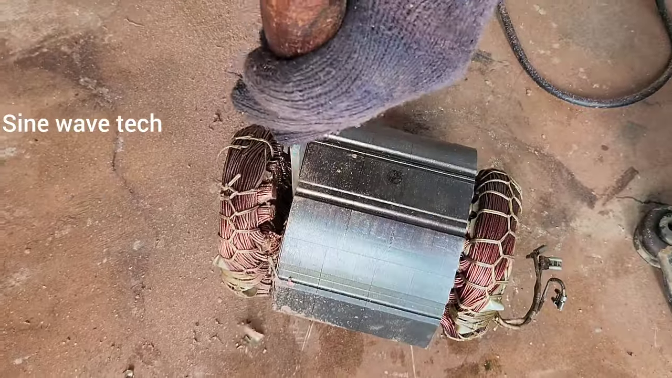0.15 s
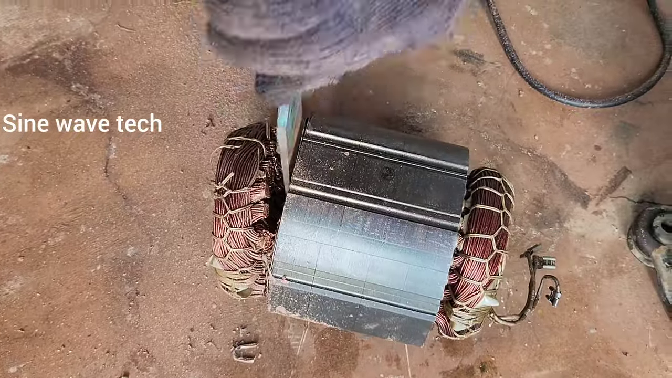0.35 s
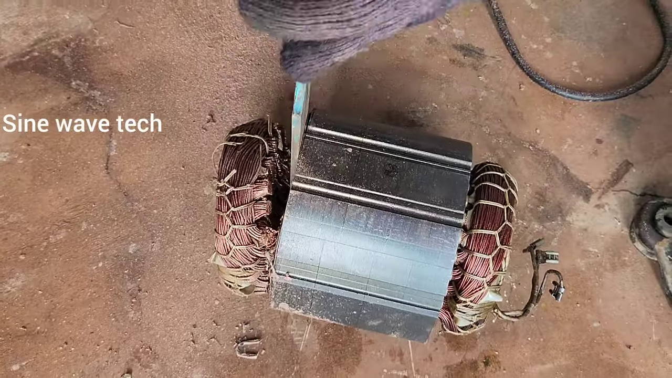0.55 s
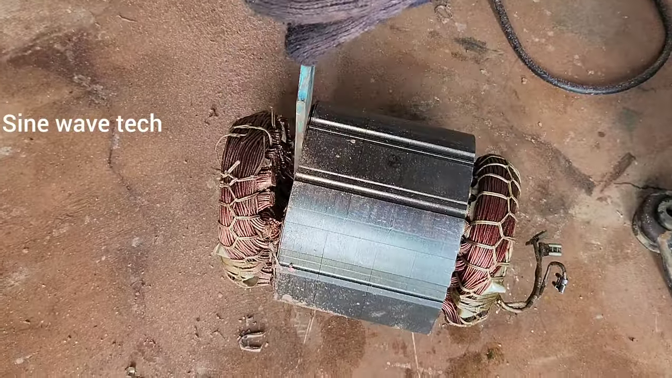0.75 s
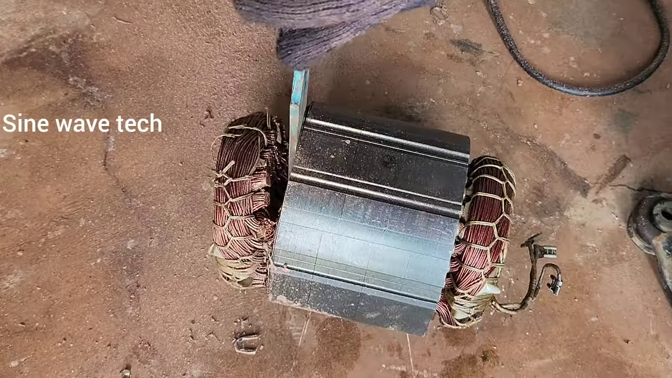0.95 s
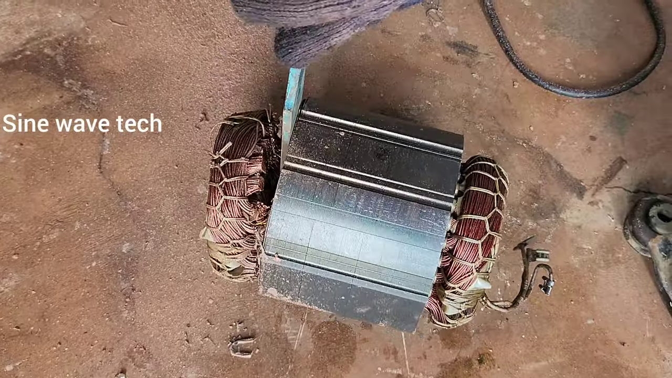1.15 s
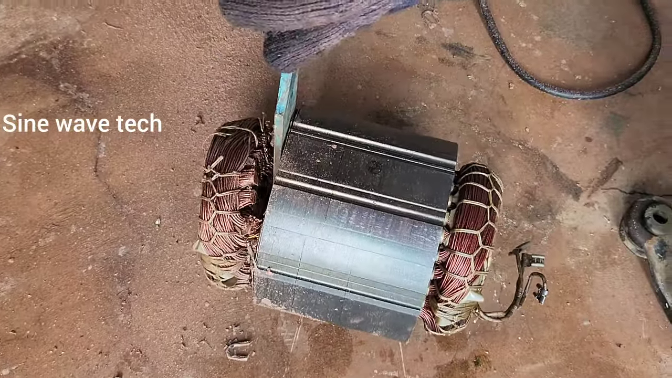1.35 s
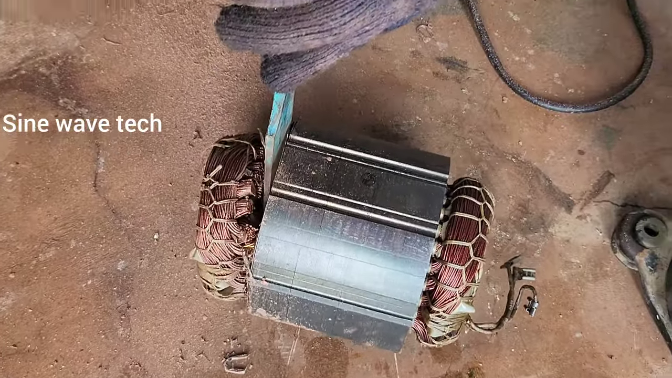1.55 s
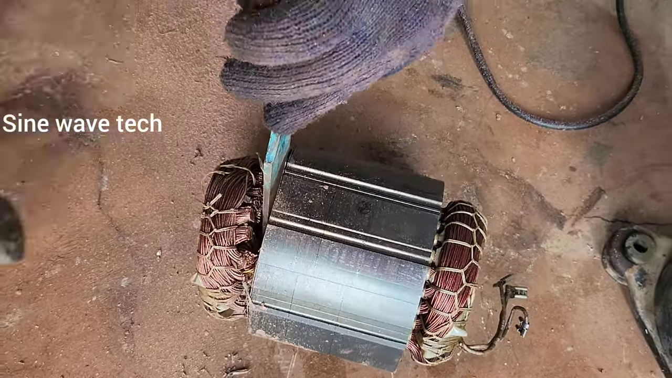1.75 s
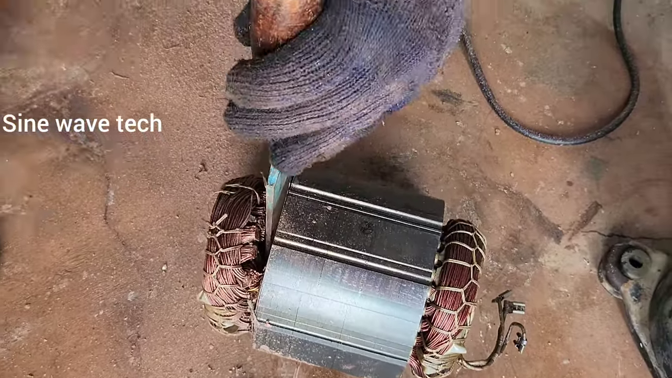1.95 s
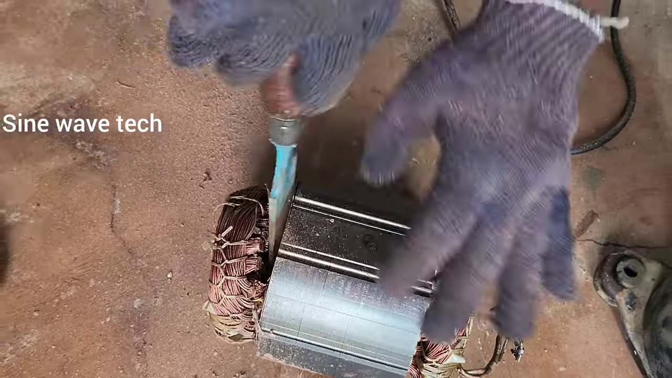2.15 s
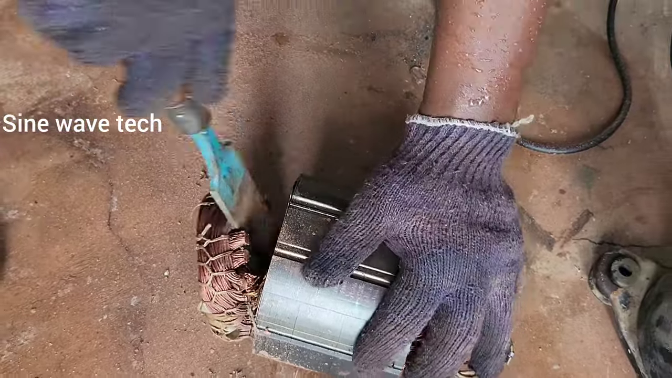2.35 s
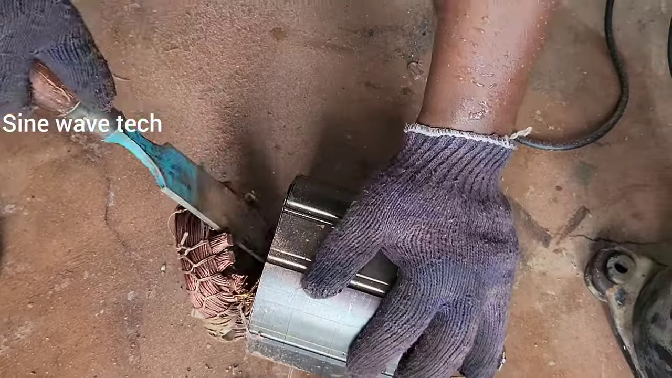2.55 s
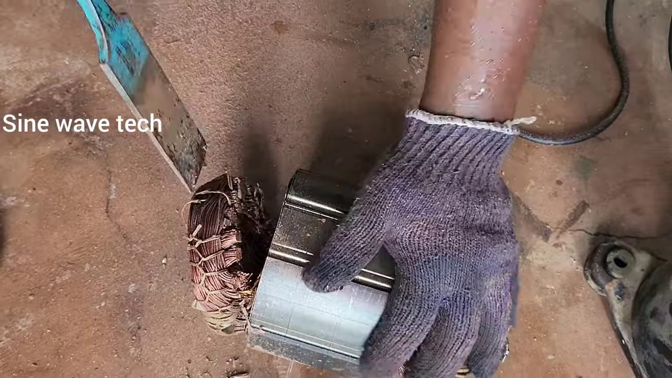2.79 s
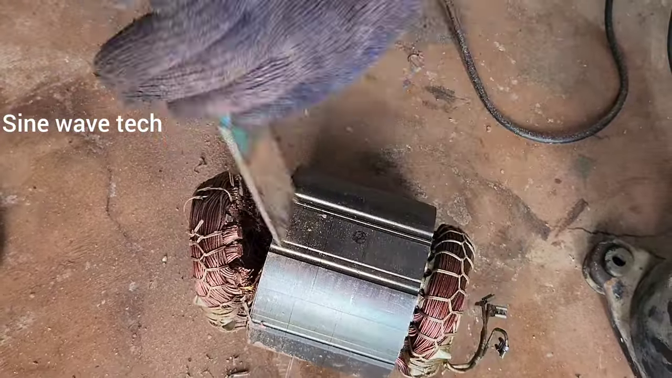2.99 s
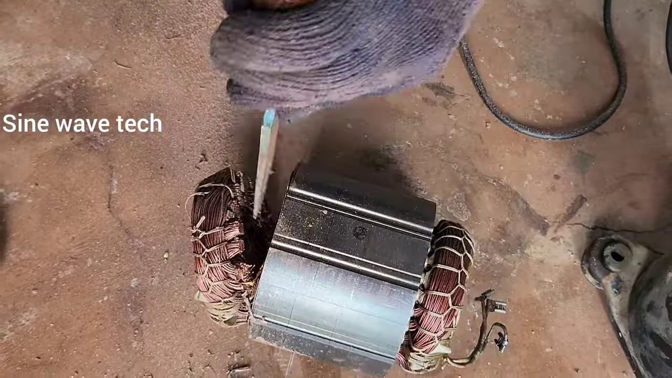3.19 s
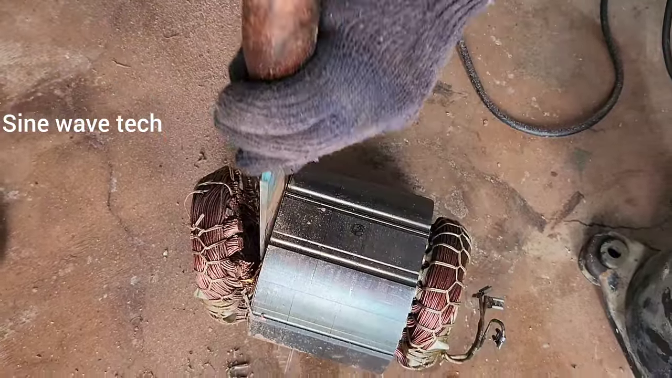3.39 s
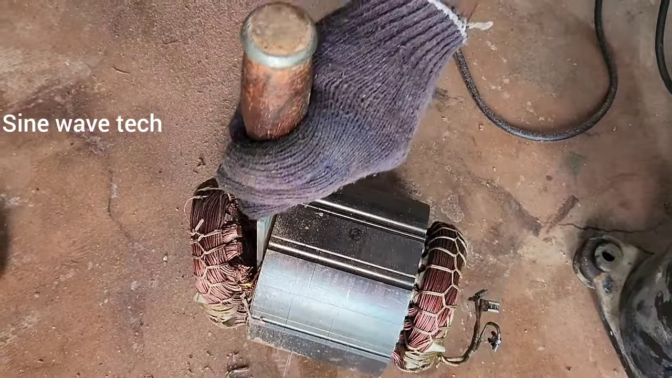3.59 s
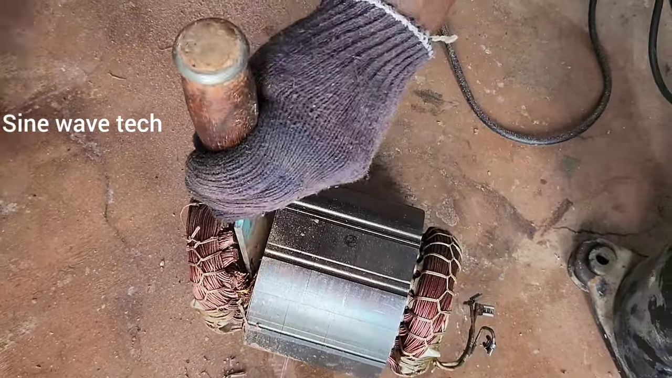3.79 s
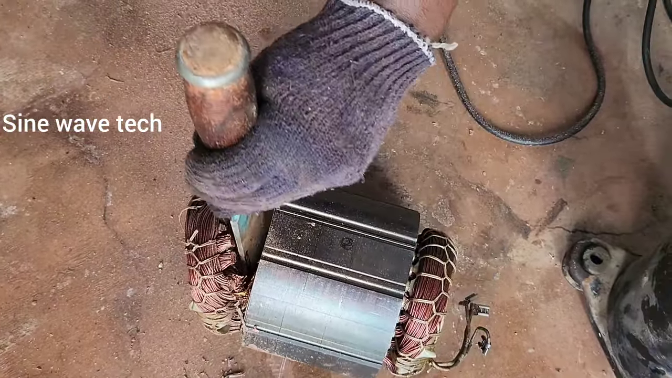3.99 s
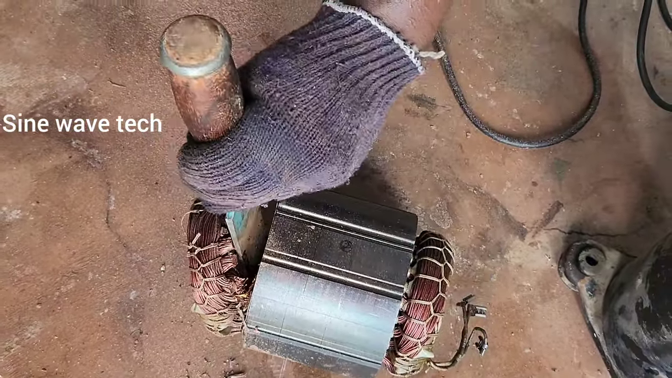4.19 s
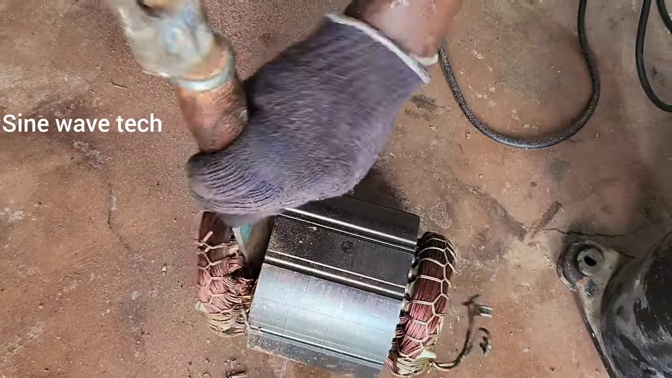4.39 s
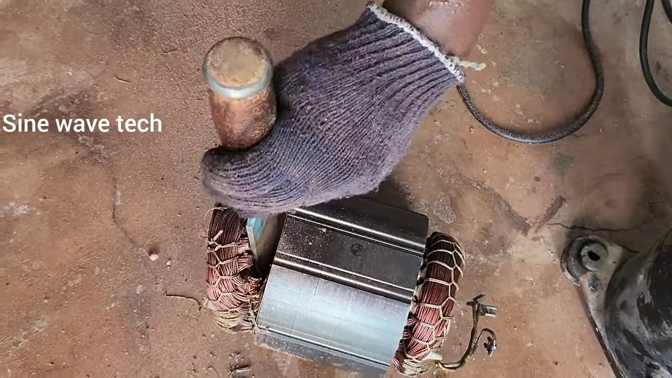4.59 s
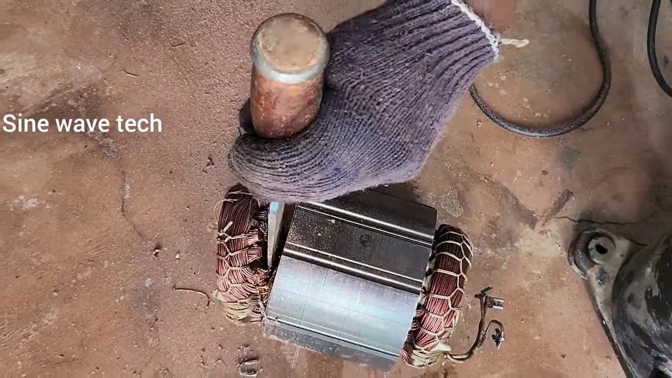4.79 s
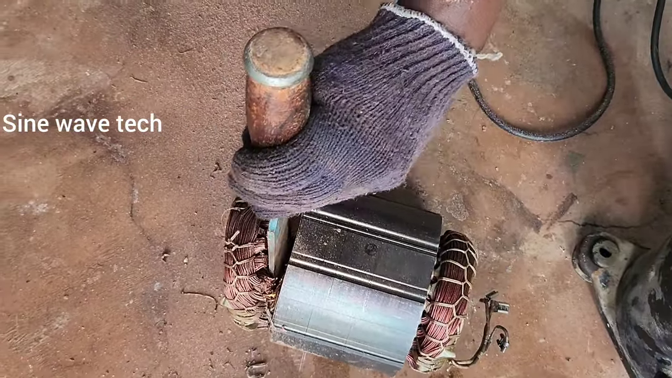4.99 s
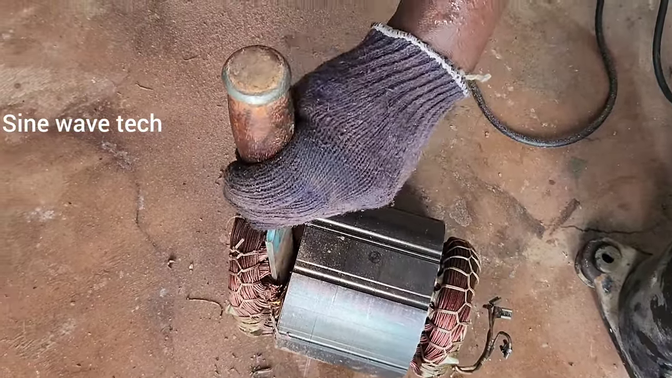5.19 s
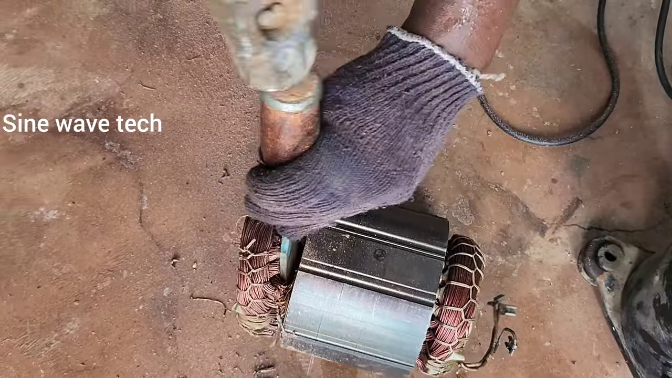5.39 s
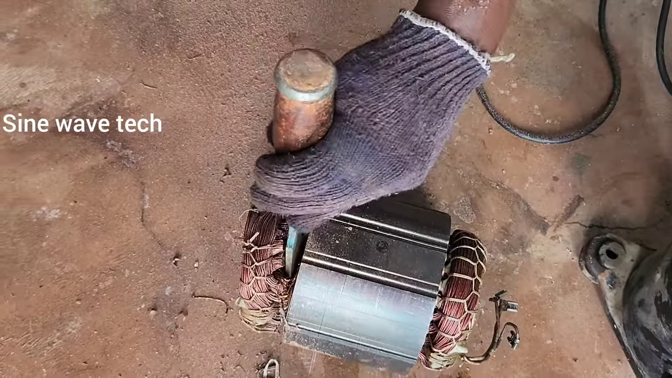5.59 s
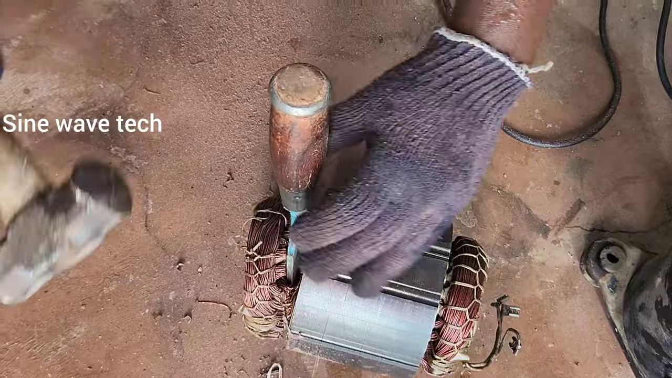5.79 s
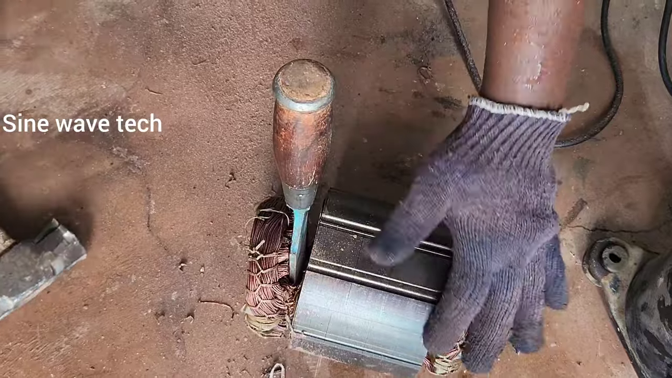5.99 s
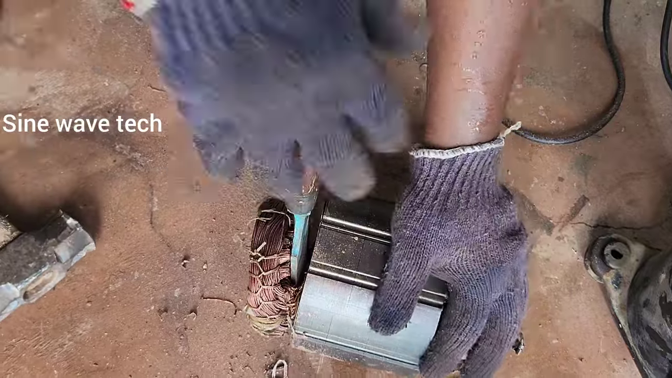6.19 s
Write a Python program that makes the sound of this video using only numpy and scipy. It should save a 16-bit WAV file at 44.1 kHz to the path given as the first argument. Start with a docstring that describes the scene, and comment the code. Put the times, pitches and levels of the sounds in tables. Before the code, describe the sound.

Close up in a small workshop, very quiet low machine rumble and soft glove rustle lie under sharp tool sounds. A hammer strikes a chisel at 0.05 s: a hard mid-heavy crack, short rattle, quickly damped metal ring, low floor shake. Small steel ticks and slides follow. Blows repeat at 1.15 and 1.5 s, with a faint hammer-head brush just before the latter. Around 1.9 s a thin squeak leads into dull floor bumps and a sharp handle clap at 2.07 s. From 2.25 to 2.8 s cut wires snap in bright, irregular crackles with scraping. The lifted chisel taps with a longer ring at 3.1 and 3.45 s; a bump lands at 3.75 s. Light clinks surround blows at 4.45 and 5.45 s, with a tap at 4.7 s. At 6.05 s bumps return, ending in a clap at 6.15 s. Echoes are short.

```python
"""Over far machinery and rustling gloves, a hammer drives a chisel into a stator's copper windings: three blows.
At 2 s it is laid down with bumps and a clap; cut wires crackle, then the lifted chisel taps and two blows follow.
At 6 s more bumps and a clap close the scene; in between the chisel slides and clinks and thin tones squeak.
Contacts are coloured noise (crack, then rattle), steel is ringing resonances, the beds are banded noise;
a small room answers with decaying noise."""
import sys
import numpy as np
from scipy import signal
from scipy.fft import rfft, irfft
from scipy.io import wavfile

SR = 44100
rng = np.random.default_rng(int(sys.argv[2]) if len(sys.argv) > 2 else 0)


def file_out(sig):
    """Save sig as 16-bit WAV at sys.argv[1]."""
    # one column per channel
    cols = np.atleast_2d(sig).T
    # limit, then scale
    lim = np.clip(cols, -1, 1)
    pcm = np.round(lim * 32767).astype(np.int16)
    wavfile.write(sys.argv[1], SR, pcm)


N = 275625   # samples in the scene

# Far machinery: t/s, rumble level/dB; then its colour: f/Hz, density/dB per Hz
RUMBLE = [(0.0, -58), (0.8, -60.5), (1.9, -60), (2.7, -61.5), (3.1, -58), (3.6, -61), (4.2, -58.5),
          (5.0, -60.5), (5.95, -66), (6.25, -66.5)]
RUMBLE_COLOUR = [(18, -42.5), (30, -18), (58, -2.5), (86, 2), (135, -1), (162, -23), (240, -19),
                 (310, -42.5), (530, -120)]
# Hum lines that each swell once: f/Hz, width/Hz, level/dB, loudest t/s, swell length/s
HUM = [(101, 4, -61, .72, .3), (72, 4, -64.5, 2.3, 0.27), (79, 6.7, -55.5, 3.95, .2),
       (60, 5, -58.5, 4.65, 0.17)]
# Gloves and tools shifting: t/s, rustle level/dB, steel-on-wire scrape level/dB
RUSTLE = [(0.0, -63.5, -82), (0.3, -73.5, -83), (0.61, -71.5, -80), (1.0, -68, -85.5), (1.76, -74.5, -83.5),
          (2.2, -73.5, -85.5), (2.5, -65.5, -64), (2.63, -71.5, -82), (2.76, -69.5, -70),
          (3.08, -64, -84.5), (3.22, -68.5, -83), (3.36, -65, -83), (3.55, -66, -70.5), (3.81, -69, -82.5),
          (4.02, -66.5, -73.5), (4.3, -68.5, -84), (4.75, -72.5, -93.5), (5.0, -73.5, -85),
          (5.5, -71.5, -86.5), (6.25, -80.5, -90)]
# Rustle colour before its tilt: f/Hz, density/dB per Hz
RUSTLE_COLOUR = [(100, -43), (170, 3.5), (239, -5.5), (279, 9), (522, 2.5), (1760, 1.5), (3000, 1.5),
                 (7340, -13.5), (8070, -7), (9390, -31), (10300, -31.5), (12700, -25.5), (16000, -38.5)]
# Room decay: f/Hz, t60/s
ROOM_DECAY = [(100, 0.52), (260, 0.4), (700, 0.14), (1840, 0.18), (4850, 0.21), (12800, 0.17)]
# Left-right likeness of diffuse sound: f/Hz, likeness/0..1
DIFFUSE_LIKENESS = [(60, .98), (130, .97), (290, .87), (640, .6), (1410, .1), (3100, .1), (15000, .05)]
# Left-right likeness of near sound: f/Hz, likeness/0..1
NEAR_LIKENESS = [(200, .97), (1000, .75), (2500, .35), (6000, .3), (15000, .3)]
# How late the right port hears near sound: f/Hz, delay/s
LAG = [(300, .00004), (1000, 0.00015), (3000, .0005), (15000, 0.00066)]
# Colour difference of the ports: f/Hz, left over right level/dB
PORTS = [(60, .5), (380, 1.5), (700, 2), (1290, 0), (2380, -2.5), (4400, -4.5), (8120, 0), (15000, 0)]
# Faint thin tones: t/s, f/Hz, level/dB, length/s
SQUEAKS = [(0.365, 1376, -77.5, 0.083), (1.909, 2890, -70, 0.04), (1.939, 2875, -59, 0.028),
           (1.964, 2903, -61.5, .1), (4.17, 1290, -77, 0.11), (5.124, 1581, -77.5, 0.12)]
# The hammer head is brushed: t/s, ring level/dB, tilt/dB per octave
BRUSHES = [(1.457, -70, -1.5), (5.847, -63.5, -1.5)]
# Hammer-head modes: f/Hz, relative level/dB, t60/s
HAMMER_MODES = [(2860, -14, .12), (4340, 0, .1), (6900, -6, .05), (8250, -3, .12), (12000, -6, .08),
                (13310, -3, .12)]
# Chisel touches or slides on steel: t/s, tick level/dB, slide level/dB, tilt/dB per octave, ring level/dB
TOUCHES = [(0.185, -41, -80, 4.5, -70), (0.3174, -59, -73, -1, -72), (0.4326, -64, -66, 8, -68),
           (0.498, -66, -78, -1.5, -68.5), (0.58, -65, -76, -2, -68), (0.626, -60, -69, -3.5, -70),
           (0.77, -75, -85, -0.5, -75.5), (0.928, -75, -78, -0.5, -71), (3.502, -64, -70.5, -4, -66),
           (3.562, -60, -67.5, -2.5, -65.5), (3.938, -58, -76, 0, -65), (4.7373, -54, -69, 0, -62),
           (4.929, -58, -78, 0, -68.5), (4.955, -68, -70, 2, -70), (5.15, -63, -74, -2, -71),
           (1.11, -68, -78, 4, -74), (4.421, -60, -78, 4, -74), (5.405, -64, -74, 4, -71)]
# The lifted chisel taps the stator: t/s, tick level/dB, slide level/dB, tilt/dB per octave, ring level/dB
TAPS = [(3.109, -43, -55.5, -5.5, -56.5), (3.4418, -46, -79, -6, -65), (4.678, -51, -63, -2, -60)]
# Colour of touches and taps before tilt: f/Hz, density/dB per Hz
TOUCH_COLOUR = [(1000, -7), (2400, -3), (4000, 1.5), (7300, 7), (9300, -15), (11000, -2.5), (13000, 0.5),
                (16000, -6)]
# Chisel modes while it rests on the work: f/Hz, relative level/dB, t60/s
CHISEL_MODES = [(1140, -8, .07), (2360, -4, .08), (3200, -6, .06), (3970, -4, .08), (5390, -8, .07),
                (7290, -4, .06), (9340, 2, .06), (11400, -12, .06), (12300, -7, .04), (13150, -2, .05)]
# Cut wires snapping free: t/s, crack level/dB, rattle level/dB, tilt/dB per octave
SNAPS = [(2.265, -59.5, -68, 1), (2.28, -61, -75, -4), (2.356, -59, -59, -4), (2.409, -47, -62, 3.5),
         (2.475, -47.5, -50, 4), (2.505, -51, -59.5, -7.5), (2.53, -66, -56.5, -3), (2.56, -48, -66, 1),
         (2.702, -54, -56, 0.5), (2.721, -46.5, -58.5, -1), (2.743, -59, -68, -6.5),
         (2.781, -47.5, -61, 4.5), (3.204, -69, -75, 8)]
# Colour of snaps before tilt, and of the wire scrape: f/Hz, density/dB per Hz
WIRE_COLOUR = [(1000, -23), (2000, -10), (3000, -2), (4500, 4), (6000, 0), (7400, 5), (9000, -5.5),
               (11800, -3), (16000, -10.5)]
# Dull bumps of tools and stator on the floor, and the knock under the lifted chisel's first tap at 3.11 s: t/s,
# crack level/dB, rattle level/dB, rattle hold/s, tilt/dB per octave
BUMPS = [(0.189, -43.5, -71, 0.026, 2.5), (1.022, -64, -59.5, 0.03, 2), (1.962, -30, -41, 0.022, -1),
         (2.017, -37.5, -47.5, 0.08, -1.5), (2.143, -47, -60.5, 0.066, 2), (3.111, -40, -60, 0.0068, 5.5),
         (3.654, -51, -61, 0.061, -7), (3.738, -34, -43, 0.02, -1), (6.041, -32.5, -42, 0.038, -1),
         (6.067, -29, -47, 0.062, -0.5), (6.109, -39.5, -46.5, 0.059, -4.5)]
# Bump colour before tilt: f/Hz, density/dB per Hz
BUMP_COLOUR = [(71, -45), (120, -24.5), (402, -0.5), (493, -9), (670, 2), (1140, -6), (1650, -8),
               (1790, -9.5), (2640, -11), (3520, -33), (11800, -49.5), (16000, -55)]
# The hammer handle claps down: t/s, crack level/dB, rattle level/dB, rattle hold/s, tilt/dB per octave
CLAPS = [(2.065, -16.5, -47, 0.064, 3), (6.153, -17, -49.5, 0.025, 1)]
# Clap colour before tilt: f/Hz, density/dB per Hz
CLAP_COLOUR = [(71, -45), (120, -15), (251, -8), (410, -6.5), (789, -11), (1030, 1), (1520, -5.5),
               (2640, -2.5), (4140, -13), (5190, -34), (6370, -32), (16000, -60)]
# Stator modes: f/Hz, relative level/dB, t60/s
STATOR_MODES = [(380, -8, .1), (600, -6, .06), (780, -3, .04), (920, 0, .04), (1150, 0, .04),
                (1300, -2, .04), (2130, -4, .05), (2520, -3, .05), (5400, -8, .2)]
# Hammer on chisel: t/s the edge bites, crack level/dB, rattle level/dB, rattle hold/s after the bite,
# tilt/dB per octave
BLOWS = [(0.049, -22, -29, 0.04, -1), (1.141, -24, -32, 0.041, 1.5), (1.533, -22, -32.5, 0.025, -1),
         (4.463, -23, -29.5, 0.046, -0.5), (5.451, -21, -28.5, 0.026, 0)]
# Blow colour before tilt: f/Hz, density/dB per Hz
BLOW_COLOUR = [(60, -24), (120, -16), (200, -19), (280, -7), (390, -3.5), (920, -7), (1600, -6), (2500, -6),
               (4000, -7.5), (4700, -10.5), (5400, -7), (6300, -18), (7500, -19.5), (10000, -33.5),
               (11800, -24), (16000, -37)]

EDGES = 25 * 2 ** np.arange(0, 9.7, .4)   # filter bank edges in Hz
CENTRES = np.sqrt(EDGES[1:] * EDGES[:-1])
SPAN = 8192   # samples in one contact
HZ = np.maximum(np.fft.rfftfreq(SPAN, 1 / SR), 10)

RUSTLE_TILT = -.5   # dB per octave
FLOOR_DB, FLOOR_RISE_S, FLOOR_T60_S = -47.5, .04, .6   # FLOOR_DB is the height before rise and decay
ROOM_DB, ROOM_GAP_S = -6.5, 0.0066   # echo level; time over which reflections build up
BOOM_DB, BOOM_T60_S, BOOM_HZ = -21, 0.56, 900   # a slower, duller part of the echo
SMALL_ROOM_DB = -1   # small sounds close by stir the room less
BRUSH_S, HAMMER_STRUCK_DB = 0.025, -61
SLIDE_S, TAP_S = 0.028, 0.0055
LIFTED_RING = 2.1   # the free chisel rings this many times longer
CHISEL_STRUCK_DB, CHISEL_DRIVEN_S = -43.5, 0.039   # the chisel rings while the blow drives it
BLOW_RING_TILT = -5   # dB per octave: the driven-in edge damps the high modes
SNAP_RATTLE_S = 0.023
STATOR_DB = -30
CRACK_LOW_HZ, CRACK_THIN = 750, 9   # below this the crack loses dB per octave: lows build up later
CRACK_RISE_S = .0008
HANDLE_GIVE_S = .008   # the wooden handle takes up the blow this long before the edge bites
LOW_CUT_HZ, CUTOFF_HZ = 33, 16600
TOP = .3   # ceiling of the soft peak rounding


def from_db(db):
    """Turns dB into amplitude."""
    return 10 ** (np.asarray(db) / 20)


def rms_one(x):
    """Scales a signal to rms 1."""
    return x / np.sqrt(np.mean(x ** 2) + 1e-20)


def in_time(rows):
    """Draws straight lines in time through each column of a table."""
    s, *columns = np.transpose(rows)
    return [np.interp(np.arange(N) / SR, s, column) for column in columns]


def at_hz(points, hz):
    """Reads a curve at any frequency, straight over log frequency."""
    points = np.array(points)
    return np.interp(np.log(hz), np.log(points[:, 0]), points[:, 1])


def band(x, k):
    """The k-th band of the filter bank."""
    return signal.sosfilt(signal.butter(2, EDGES[k:k + 2], "band", fs=SR, output="sos"), x)


def band_gains(spectrum, tilt):
    """Gains that give unit white noise this spectrum, tilted about 2 kHz, at rms 1."""
    gains = from_db(at_hz(spectrum, CENTRES) + tilt * np.log2(CENTRES / 2000))
    return gains / np.sqrt(np.sum(gains ** 2 * np.diff(EDGES)) / (SR / 2))


def causal(db):
    """The filter with these dB at HZ that does not ring ahead; unit noise comes out at rms 1."""
    db = db - 10 * np.log10(np.mean(from_db(db) ** 2))
    cepstrum = irfft(db * np.log(10) / 20)
    # folding the cepstrum forward in time makes the filter minimum phase
    cepstrum[1:SPAN // 2] *= 2
    cepstrum[SPAN // 2 + 1:] = 0
    return np.exp(rfft(cepstrum))


def drift(rate):
    """Slow chance: noise at every 40th sample through a double one-pole low-pass; spread 1."""
    r = np.exp(-80 * np.pi * rate / SR)
    noise = rng.standard_normal(N // 40 + 2002)
    slow = signal.lfilter([1], [1, -2 * r, r * r], noise)[2000:]
    return np.interp(np.arange(N) / 40, np.arange(len(slow)), rms_one(slow))


def ring(x, hz, t60):
    """A resonance: a unit click sets a decaying sine of starting height 1 ringing."""
    r, w = from_db(-60 / (t60 * SR)), 2 * np.pi * hz / SR
    return signal.lfilter([0, np.sin(w)], [1, -2 * r * np.cos(w), r * r], x + 1e-18)


def grit(size, spread_db):
    """Dense small collisions of uneven strength; rms 1."""
    strength = from_db(spread_db * np.minimum(rng.exponential(1, size), 5))
    return rms_one(rng.standard_normal(size) * strength)


def held(length_s, fade_s, rise_s=0.0021):
    """An envelope that rises, stays up until length_s, then dies away."""
    t = np.arange(SPAN) / SR
    return np.minimum(t / rise_s, 1) * np.exp(-np.maximum(t - length_s, 0) / fade_s)


def add(track, s, piece):
    """Lays a piece into a track at s seconds."""
    at = round(s * SR)
    track[..., at:at + piece.shape[-1]] += piece[..., :N - at]


def diffuse(white, k):
    """One band of sound from all sides: the ports grow less alike towards the treble."""
    mid, side = band(white, k)
    alike = np.clip(at_hz(DIFFUSE_LIKENESS, CENTRES[k]), 0, 1)
    return np.sqrt((1 + alike) / 2) * mid + np.sqrt((1 - alike) / 2) * side * [[1], [-1]]


def contacts(events, spectrum, crack_s, crack_tilt, fade_s, spread_db, ripple_db, rise_s, lead_s=0):
    """A short crack and a rattle of loose parts; each port hears its own share of the many small collisions."""
    out = np.zeros((2, N))
    alike = at_hz(NEAR_LIKENESS, HZ)
    late = np.exp(-2j * np.pi * HZ * at_hz(LAG, HZ))
    octaves = np.log2(np.maximum(HZ, 200) / 2000)
    thin = CRACK_THIN * np.maximum(np.log2(CRACK_LOW_HZ / HZ), 0)
    for s, crack_db, rattle_db, length_s, tilt in events:
        crack = from_db(crack_db) * held(crack_s, crack_s / 2, CRACK_RISE_S)
        rattle = from_db(rattle_db) * held(length_s + lead_s, fade_s, rise_s)
        crack_slope = (tilt + crack_tilt) * octaves - thin
        for at, shape, slope in (s, crack, crack_slope), (s - lead_s, rattle, tilt * octaves):
            # a random ripple every third of an octave
            ripple = np.interp(np.log2(HZ / 100), np.arange(0, 8, 1 / 3), rng.normal(0, ripple_db, 24))
            colour = causal(at_hz(spectrum, HZ) + slope + ripple)
            left, other = rfft(shape * [grit(SPAN, spread_db), grit(SPAN, spread_db)])
            right = alike * late * left + np.sqrt(1 - alike ** 2) * other
            add(out, at, irfft(colour * [left, right])[:, :SPAN * 7 // 8])
    return out


def steel(modes, strokes, luck_db):
    """Noise strokes (s, dB, length s, tilt) drive every mode of one piece of steel, each with chance strength."""
    out = 0
    pieces = [rng.standard_normal(SPAN) * held(length_s, 0.0027) for _, _, length_s, _ in strokes]
    chance = rng.normal(0, luck_db, (len(strokes), len(modes)))
    for k, (hz, mode_db, t60) in enumerate(modes):
        drive = np.zeros(N)
        for (s, db, _, tilt), piece, luck in zip(strokes, pieces, chance):
            # the dB set the height of the ring, however long the stroke
            reached = np.abs(ring(piece, hz, t60)).max()
            height_db = db + mode_db + tilt * np.log2(hz / 5000) + luck[k]
            add(drive, s, piece * from_db(height_db) / reached)
        at_right = np.roll(drive, round(at_hz(LAG, hz) * SR))
        out = out + ring(np.array([drive, at_right]), hz, t60)
    return out


def floor_shake():
    """Power of the low rumble that builds up in the floor after each blow and dies away."""
    since = np.maximum(np.arange(N) / SR - np.array(BLOWS)[:, :1], 0)
    shape = (1 - np.exp(-since / FLOOR_RISE_S)) * from_db(FLOOR_DB - 60 * since / FLOOR_T60_S)
    return np.sum(shape ** 2, axis=0)


def background():
    """Rustle and wire scrape flicker in patches over machinery and floor rumble, all as diffuse noise bands."""
    rustle_db, scrape_db = in_time(RUSTLE)
    rumble = np.sqrt(from_db(in_time(RUMBLE)[0]) ** 2 + floor_shake())
    white = rng.standard_normal((2, 2, N))
    together = drift(11)   # shared by all rustle bands
    scrape = from_db(scrape_db + 1.2 * drift(40))
    rustle_gains = band_gains(RUSTLE_COLOUR, RUSTLE_TILT)
    scrape_gains = band_gains(WIRE_COLOUR, 0)
    rumble_gains = band_gains(RUMBLE_COLOUR, 0)
    out = 0
    for k in range(len(CENTRES)):
        rustle = from_db(rustle_db + 0.92 * together + 0.47 * drift(7.9))
        power = (rustle_gains[k] * rustle) ** 2
        power = power + (scrape_gains[k] * scrape) ** 2 + (rumble_gains[k] * rumble) ** 2
        out = out + diffuse(white[k % 2], k) * np.sqrt(power)
    return out


def hum():
    """Narrow low lines of the machinery: noise through resonances, each swelling and fading."""
    t, white = np.arange(N) / SR, rng.standard_normal(N)
    out = np.zeros(N)
    for hz, width, db, s, length_s in HUM:
        swell = from_db(db) * np.exp(-((t - s) / length_s) ** 2)
        t60 = np.log(1000) / np.pi / width
        out += swell * rms_one(ring(white, hz, t60))
    return out


def room(x):
    """Dense reflections that die band by band, with a slower boom under them."""
    t, white = np.arange(SR // 2) / SR, rng.standard_normal((2, 2, SR // 2))
    boom = from_db(BOOM_DB - 60 * t / BOOM_T60_S)
    tail = 0
    for k, hz in enumerate(CENTRES):
        decay = from_db(-60 * t / at_hz(ROOM_DECAY, hz))
        tail = tail + diffuse(white[k % 2], k) * (decay + boom / (1 + (hz / BOOM_HZ) ** 2))
    tail *= np.clip(t / ROOM_GAP_S, 0, 1) ** 2
    tail /= np.sqrt(np.sum(tail ** 2) / 2)
    return signal.fftconvolve(x[None], tail, axes=1)[:, :N]


def squeaks():
    """Short, rough tones: noise through a narrow resonance."""
    out = np.zeros(N)
    for s, hz, db, length_s in SQUEAKS:
        t = np.arange(round(length_s * SR)) / SR
        tone = rms_one(ring(rng.standard_normal(SPAN), hz, .3))[-len(t):]
        add(out, s, from_db(db) * np.sin(np.pi * t / length_s) * tone)
    return out


def hammer_ring():
    """The hammer head rings faintly when brushed and at every blow."""
    strokes = [(s, db, BRUSH_S, tilt) for s, db, tilt in BRUSHES]
    strokes += [(row[0], HAMMER_STRUCK_DB, .003, 3.0) for row in BLOWS]
    return steel(HAMMER_MODES, strokes, luck_db=1.5)


def wire_snaps():
    """Cut wires snap free: bright cracks with a brief rattle."""
    snaps = [(s, crack_db, rattle_db, SNAP_RATTLE_S, tilt) for s, crack_db, rattle_db, tilt in SNAPS]
    return contacts(snaps, WIRE_COLOUR, crack_s=0.0038, crack_tilt=1.5, fade_s=0.0096,
                    spread_db=-1.0, ripple_db=2.0, rise_s=.004)


def chisel_touches():
    """The chisel touches, slides or taps: a tick, then a soft slide on steel."""
    slides = [(s, tick_db, slide_db, SLIDE_S, tilt) for s, tick_db, slide_db, tilt, _ in TOUCHES + TAPS]
    return contacts(slides, TOUCH_COLOUR, crack_s=0.0011, crack_tilt=0.4, fade_s=0.0089,
                    spread_db=1.0, ripple_db=2.5, rise_s=.009)


def chisel_ring():
    """Touches and blows ring the chisel briefly; lifted for a tap, it rings longer."""
    strokes = [(s, ring_db, SLIDE_S, tilt) for s, _, _, tilt, ring_db in TOUCHES]
    strokes += [(row[0], CHISEL_STRUCK_DB, CHISEL_DRIVEN_S, BLOW_RING_TILT) for row in BLOWS]
    lifted_modes = [(hz, db, t60 * LIFTED_RING) for hz, db, t60 in CHISEL_MODES]
    taps = [(s, ring_db, TAP_S, tilt) for s, _, _, tilt, ring_db in TAPS]
    return steel(CHISEL_MODES, strokes, luck_db=1.5) + steel(lifted_modes, taps, luck_db=1.2)


def floor_bumps():
    """Tools and stator bump dully on the floor; the lifted chisel's first tap knocks the same way."""
    return contacts(BUMPS, BUMP_COLOUR, crack_s=0.0026, crack_tilt=0.73, fade_s=0.014,
                    spread_db=1.5, ripple_db=3.5, rise_s=0.0036)


def handle_claps():
    """The hammer handle claps down: a very short crack far above its rattle."""
    return contacts(CLAPS, CLAP_COLOUR, crack_s=0.0012, crack_tilt=1.3, fade_s=0.0065,
                    spread_db=4.0, ripple_db=0.0, rise_s=0.0036)


def stator_ring():
    """Each blow sets the modes of the stator ringing."""
    return steel(STATOR_MODES, [(row[0], STATOR_DB, .006, 0) for row in BLOWS], luck_db=2.5)


def hammer_blows():
    """The blow cracks as the edge bites; the rattle starts just before, as the handle takes up the blow."""
    return contacts(BLOWS, BLOW_COLOUR, crack_s=0.006, crack_tilt=-.5, fade_s=0.023,
                    spread_db=4.0, ripple_db=2.5, rise_s=.02, lead_s=HANDLE_GIVE_S)


def scene():
    """Small close sounds and heavy strokes, the room's answer to both, and the beds beneath."""
    small = squeaks() + hammer_ring() + wire_snaps() + chisel_touches() + chisel_ring()
    heavy = floor_bumps() + handle_claps() + stator_ring() + hammer_blows()
    echo = from_db(ROOM_DB) * room(heavy[0] + from_db(SMALL_ROOM_DB) * small[0])
    return background() + hum() + echo + small + heavy


def record(dry):
    """The two ports differ in colour, the deepest bass is lost, the loudest peaks are rounded, the top is cut."""
    hz = np.maximum(np.fft.rfftfreq(N, 1 / SR), 1)
    port_gains = from_db(at_hz(PORTS, hz) / 2 * [[1], [-1]])
    coloured = irfft(rfft(dry) * port_gains, N)
    coloured = signal.sosfilt(signal.butter(2, LOW_CUT_HZ, "high", fs=SR, output="sos"), coloured)
    rounded = TOP * np.tanh(coloured / TOP)
    return signal.sosfilt(signal.cheby2(14, 70, CUTOFF_HZ, fs=SR, output="sos"), rounded)


dry = scene()
out = record(dry)
file_out(out)
```